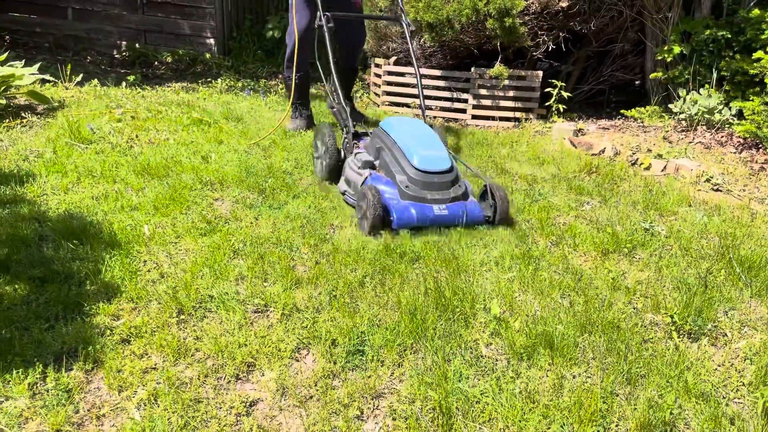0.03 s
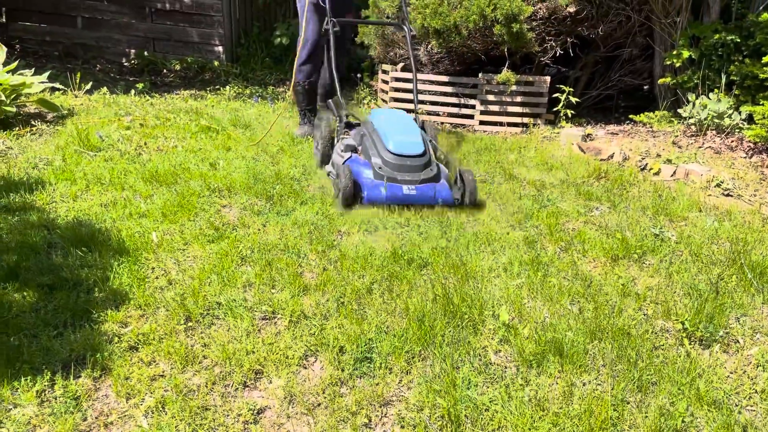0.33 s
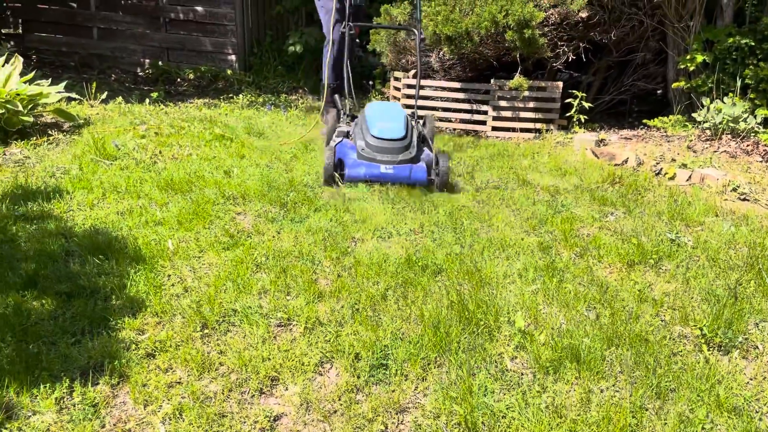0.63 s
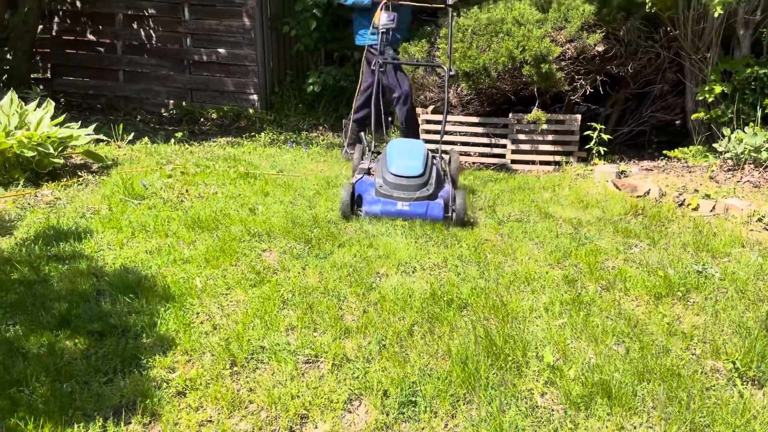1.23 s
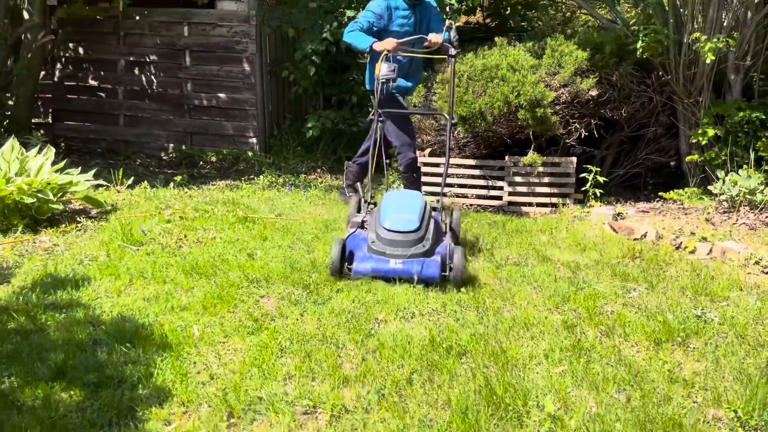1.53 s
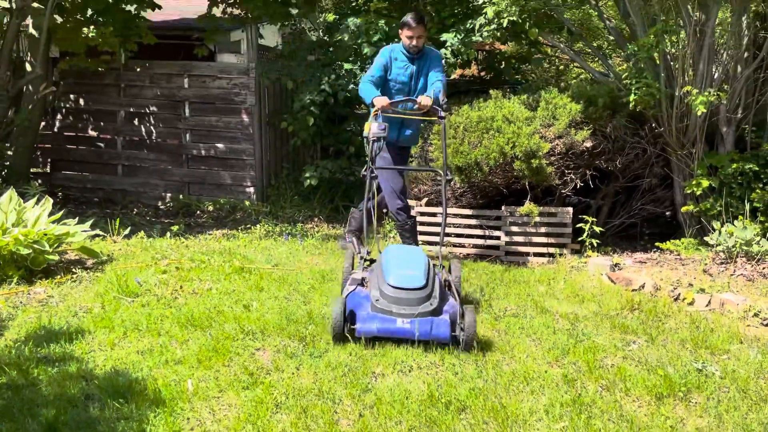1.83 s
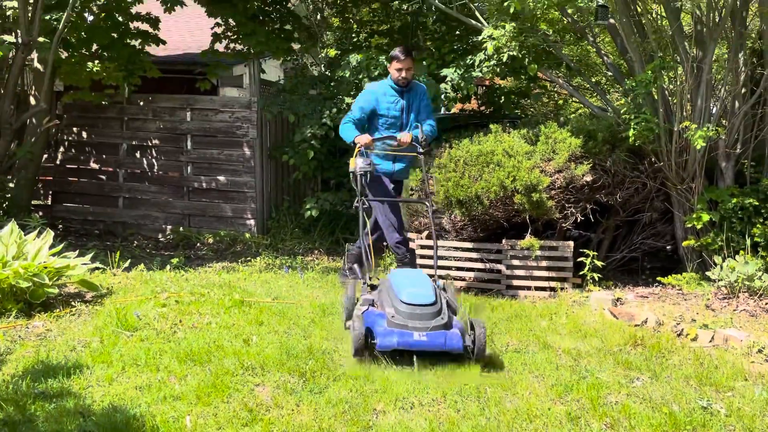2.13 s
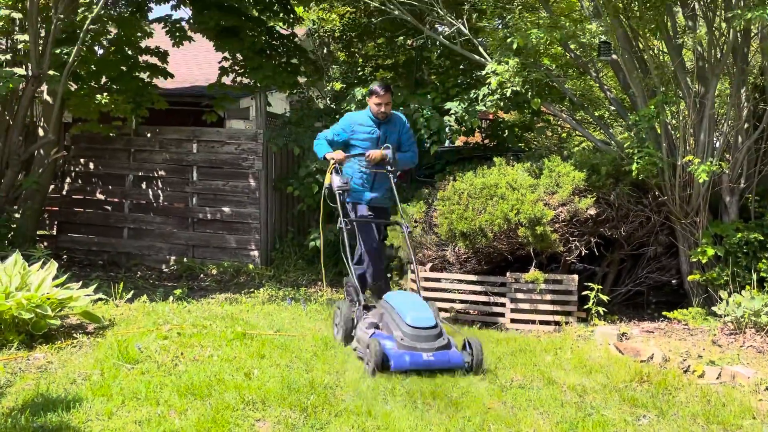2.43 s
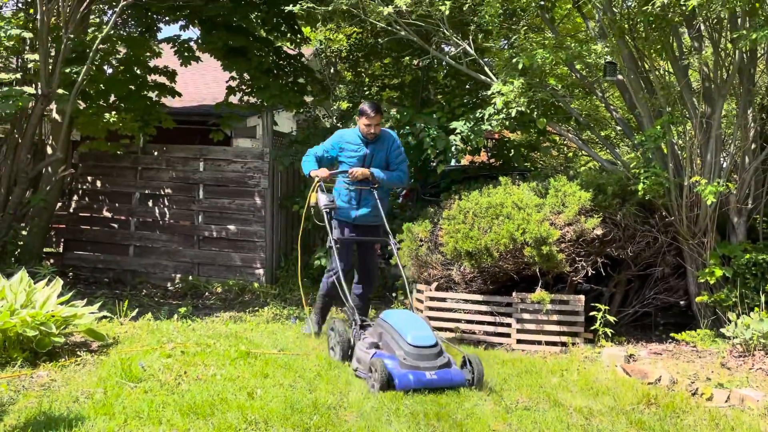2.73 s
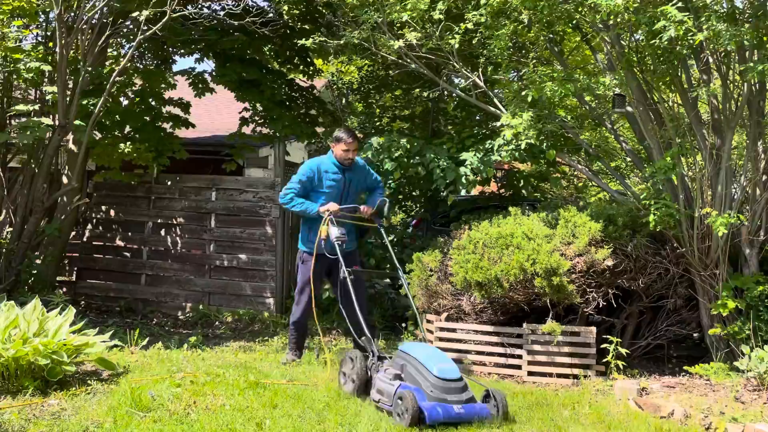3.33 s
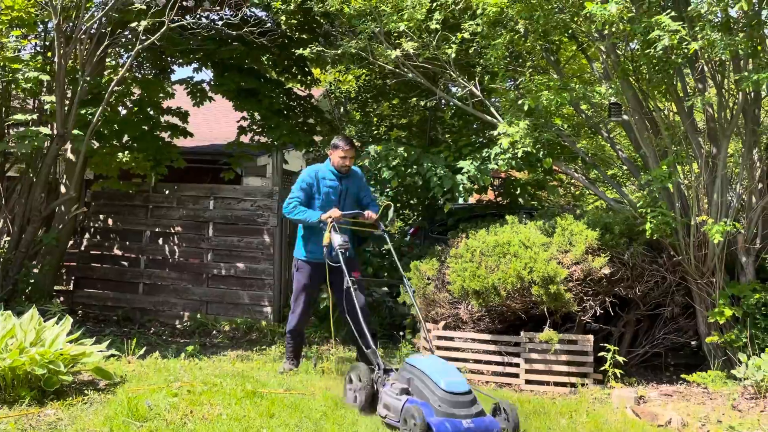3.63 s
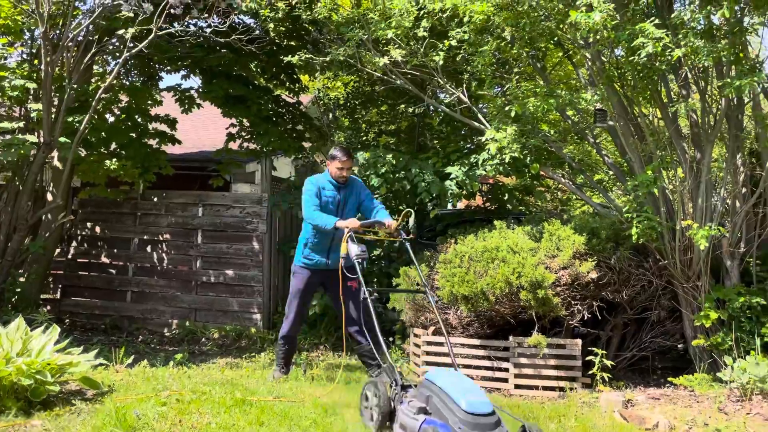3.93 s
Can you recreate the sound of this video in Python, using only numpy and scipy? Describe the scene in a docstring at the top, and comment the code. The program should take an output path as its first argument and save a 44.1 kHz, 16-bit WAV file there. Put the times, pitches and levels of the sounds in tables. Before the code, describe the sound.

An electric mower hums and whirs steadily as it moves over a lawn close to the microphone. Cut grass hisses, with small snaps and ticks early on, a single knock midway and a faint motor whine near the end.

```python
"""A pulsing drone and a rush of air: an electric mower is pulled back and pushed on over a nearby lawn.
Its two-armed blade sounds at twice the shaft speed and churns the air under the deck in puffs.
Grass hisses and crackles as it is cut, twigs knock on the deck and stalks snap against it.
There is one tiny squeak, and the thin whine of the motor rises near the end."""
import sys
import numpy as np
from scipy import signal
from scipy.fft import rfft, irfft
from scipy.io import wavfile
from scipy.ndimage import map_coordinates

SR = 44100
rng = np.random.default_rng(int(sys.argv[2]) if len(sys.argv) > 2 else 0)


def digitize_waveform(pressure):
    """Quantize a signal to 16-bit integers and store it at the path in sys.argv[1].

    Rows of a 2-D input are taken as channels; values are limited to [-1, 1].
    """
    field = np.atleast_2d(pressure).T
    bounded = np.clip(field, -1, 1)
    quanta = np.round(bounded * 32767).astype(np.int16)
    wavfile.write(sys.argv[1], SR, quanta)


N = 176400
T = np.arange(N) / SR
HZ = np.fft.rfftfreq(N, 1 / SR)

# Shaft speed, sagging a little under load (time [s], speed [turns/s])
SHAFT_SPEED = [(0, 60.7), (.3, 59.5), (.8, 58.8), (1.9, 59), (2.3, 59.55), (3, 59.6), (4, 60.3)]
# First four blade harmonics, swelling and fading as the mower moves (time [s], level [dB])
HARMONIC_1 = [(0, -16.5), (.1, -16), (.4, -17), (.68, -21.5), (1.1, -20), (1.4, -25.5), (1.55, -21.5),
              (2.1, -15.5), (2.28, -21), (2.42, -18.5), (3.3, -21.5), (3.45, -19), (4, -21)]
HARMONIC_2 = [(0, -19), (.17, -24), (.45, -29), (.56, -23), (.74, -29), (1.02, -21.5), (1.25, -35),
              (1.39, -21), (1.62, -30), (1.82, -25), (2.13, -28.5), (2.4, -24), (3.1, -21.5), (3.42, -28),
              (3.65, -21.5), (4, -27)]
HARMONIC_3 = [(0, -28), (.12, -17.5), (.24, -27.5), (.43, -21), (.53, -43), (1.22, -45), (1.32, -24.5),
              (1.56, -34.5), (1.67, -26.5), (2.2, -31.5), (2.36, -27), (3, -29), (3.5, -31), (4, -24)]
HARMONIC_4 = [(0, -31.5), (.26, -28), (.62, -36), (1.1, -29.5), (1.56, -33.5), (1.7, -25), (2, -35),
              (2.25, -37), (2.6, -33), (3.05, -26), (3.6, -42.5), (4, -28.5)]
# Once-per-turn throb of the unbalanced blade (time [s], level [dB])
THROB_LEVEL = [(0, -41), (2, -39.5), (2.5, -37), (4, -37)]
# Weaker tones (order [multiple of shaft speed], level [dB])
WEAK_TONES = [(3, -41), (9, -45), (10, -41), (12, -40.5), (14, -44.5), (18, -45)]
# Slide in the colour of rasp and buzz as the ground reflection changes (time [s], frequency ratio [1])
COLOUR_SHIFT = [(0, 0.97), (.9, .86), (3, 1)]
# Chopping of the air by the blade (time [s], relative depth [1])
CHOP_DEPTH = [(0, 0.83), (1.3, 0.69), (3.2, 0.96)]
# Churned air, the blade's rasp, a bright two-peaked buzz (frequency [Hz], relative density [dB])
ROAR_SPECTRUM = [(25, -29), (45, -13), (90, -6.5), (150, -0.5), (560, 1), (850, -8), (1850, -16.5),
                 (3200, -20.5), (6000, -33), (15500, -51.5)]
RASP_SPECTRUM = [(500, -28), (800, -4.5), (1020, -2.5), (1250, -1), (1700, -8.5), (2000, -14),
                 (4000, -30.5)]
BUZZ_SPECTRUM = [(1950, -20.5), (2300, 4), (2550, -7.5), (2850, 2), (3300, -20.5)]
# Strength of the rasp and of the bright buzz (time [s], relative level [dB])
RASP_LEVEL = [(.3, -27.5), (.6, -30.5), (1.1, -33.5), (1.5, -30), (1.85, -27), (2.13, -24.5), (2.25, -29.5),
              (2.9, -32), (3.5, -29.5)]
BUZZ_LEVEL = [(.2, -36.5), (.7, -42), (1.5, -38), (2.3, -40.5), (2.9, -39), (4, -40.5)]
# Cutting hiss and flying clippings (frequency [Hz], relative density [dB])
HISS_SPECTRUM = [(1000, -4.5), (1660, 6), (1850, -0.5), (3200, -2), (3800, 3.5), (4500, 1), (6000, -0.5),
                 (7500, -2), (9000, -4.5), (15500, -49)]
CLIPPING_SPECTRUM = [(3800, -22), (7000, 1.5), (10000, -1), (15500, -14)]
# Strength of the hiss and of the clippings (time [s], relative level [dB])
HISS_LEVEL = [(0, -34.5), (.3, -32.5), (.42, -38), (.5, -40), (.77, -34.5), (.84, -45), (1.15, -43),
              (1.75, -35.5), (1.92, -30), (2.12, -30.5), (2.25, -38), (2.9, -39.5), (3.5, -35), (4, -36.5)]
CLIPPING_LEVEL = [(0, -39), (.55, -34.5), (.95, -42.5), (1.45, -39.5), (1.8, -45), (2.3, -44), (3.1, -48.5),
                  (3.55, -38), (4, -39)]
# Twigs striking the plastic deck (time [s], level [dB], resonance [Hz])
TWIG_KNOCKS = [(0.136, -29, 2500), (0.153, -27.5, 3800), (0.524, -25.5, 2400), (.692, -26, 2400),
               (.694, -29.5, 4900), (2.276, -15.5, 615)]
# Stalks breaking (time [s], level [dB])
STALK_SNAPS = [(.1363, -18.5), (.465, -22), (0.48, -21), (.489, -24), (0.506, -19.5), (.523, -21),
               (.772, -25), (.787, -22), (.981, -25), (1.644, -27), (2.093, -25), (2.681, -22.5),
               (3.566, -23), (3.575, -22), (3.593, -26), (3.88, -23.5)]
# Crack of a stalk (frequency [Hz], relative density [dB])
SNAP_SPECTRUM = [(2000, -3.5), (10000, -3.5), (15500, -8.5)]
# Course of the squeak (time [s], pitch [Hz], level [dB])
SQUEAK_PATH = [(1.305, 9750, -75), (1.325, 9800, -32.5), (1.35, 10000, -43), (1.39, 10100, -37),
               (1.41, 10300, -70)]
# Whine of the motor (time [s], level [dB])
WHINE_LEVEL = [(2.7, -60), (3, -50.5), (4, -53)]
# Likeness of left and right (frequency [Hz], coherence [0-1])
COHERENCE = [(300, 0.98), (700, 0.76), (2400, 0.95), (6100, 0.55), (7000, 1), (11000, 0.98)]
# Stereo balance (time [s], left minus right [dB])
BALANCE = [(1, .5), (4, -.7)]
# Phase difference at the microphone pair (frequency [Hz], lead of left [rad])
PHASE_LEAD = [(2200, .1), (3500, .8), (5000, .1), (6000, .5), (6700, 3.05), (7800, 3.1), (10300, .1),
              (11900, 0), (13600, -3.1)]


def amp(db):
    """Amplitude grows tenfold with every 20 dB."""
    return 10 ** (np.asarray(db) / 20)


def unit(x):
    """Normalisation to rms 1."""
    return x / np.sqrt(np.mean(x ** 2) + 1e-20)


def curve(rows, column=1):
    """Linear interpolation of a time table at every sample."""
    rows = np.array(rows)
    return np.interp(T, rows[:, 0], rows[:, column])


def across(rows):
    """Interpolation of a frequency table at every bin, on a logarithmic axis."""
    hz, value = np.transpose(rows)
    return np.interp(np.log(HZ + 1), np.log(hz + 1), value)


def noise():
    """White Gaussian noise in two independent channels."""
    return rng.standard_normal((2, N))


def colour(x, spectrum):
    """Spectral shaping that conserves the power of white noise."""
    return irfft(rfft(x) * unit(amp(across(spectrum))), N)


def drift(rate_hz):
    """Low-pass filtered noise gives a smooth random fluctuation of rms 1."""
    return unit(irfft(rfft(rng.standard_normal(N)) * np.exp(-(HZ / rate_hz) ** 2), N))


def decay(start, decay_s):
    """Exponential damping after a sudden onset."""
    return (T >= start) * np.exp(-abs(T - start) / decay_s)


def spread(pair):
    """The sum and difference of independent signals form a partly coherent left and right."""
    coherence = np.clip(across(COHERENCE), 0, 1)
    mid, side = irfft(rfft(pair) * np.sqrt([(1 + coherence) / 2, (1 - coherence) / 2]), N)
    return np.array([mid + side, mid - side])


def blade(angle):
    """Periodic forcing: two arms radiate even shaft orders, imbalance the first; weaker orders join in."""
    harmonics = [HARMONIC_1, HARMONIC_2, HARMONIC_3, HARMONIC_4]
    tones = [(2 * k, curve(level)) for k, level in enumerate(harmonics, 1)]
    tones += [(1, curve(THROB_LEVEL))]
    tones += [(round(order), db + 3 * drift(rate_hz=8)) for order, db in WEAK_TONES]
    wander_rad, channel_wander_rad, flutter_db = .03, .032, .5
    out = np.zeros((2, N))
    for order, db in tones:
        lag = .1 * (order / 2) ** 2  # the deck delays the higher tones a little
        phase = order * (angle + wander_rad * drift(rate_hz=7.7)) - lag
        level = amp(db + flutter_db * drift(rate_hz=26))
        for channel in out:
            channel += level * np.cos(phase + order * channel_wander_rad * drift(rate_hz=2.1))
    return np.sqrt(2) * out


def sliding_turbulence(spectrum):
    """Interference: the noise's colour slides as the ground reflection changes with the mower's movement."""
    position = np.cumsum(curve(COLOUR_SHIFT))  # resampling scales every frequency
    turbulence = colour(noise(), spectrum)
    return np.array([map_coordinates(channel, [position], mode="wrap") for channel in turbulence])


def air(angle):
    """Amplitude modulation: each blade arm puffs the turbulence, strongly in the rasp, weakly in the roar."""
    puffs = curve(CHOP_DEPTH) * abs(np.cos(angle)) ** 6
    chop = puffs + .095 * np.cos(angle)  # one arm's puff is the stronger
    roar = colour(noise() * unit(1 + .083 * chop), ROAR_SPECTRUM)
    rasp = sliding_turbulence(RASP_SPECTRUM) * unit(1 + .77 * chop)
    buzz = sliding_turbulence(BUZZ_SPECTRUM) * unit(1 + .5 * chop)
    swell_db = curve(RASP_LEVEL)
    roar_db = -25 + .39 * (swell_db - swell_db.mean())  # follows the rasp in part
    rasp_db = swell_db - 2 + .9 * drift(rate_hz=32)
    return spread(roar * amp(roar_db) + rasp * amp(rasp_db) + buzz * amp(curve(BUZZ_LEVEL)))


def grass(clicks_per_s=240, click_decay_s=.0012):
    """Shot noise: countless cuts merge into a hiss, while sparser flying clippings crackle."""
    hiss_db = curve(HISS_LEVEL) - 4 + 2.25 * drift(rate_hz=19)
    hiss = colour(noise() * amp(hiss_db), HISS_SPECTRUM)
    click_db = 4.5 * np.minimum(rng.exponential(1, N), 3)
    clicks = amp(click_db) * (rng.random(N) < clicks_per_s / SR)
    bursts = unit(signal.lfilter([1], [1, -np.exp(-1 / (click_decay_s * SR))], clicks))
    envelope = np.hypot(1, amp(-1) * bursts)  # bursts add in power to a steady floor
    crackle = colour(noise() * envelope * amp(curve(CLIPPING_LEVEL) - 6), CLIPPING_SPECTRUM)
    return spread(hiss + crackle)


def twigs(decay_s=.0087, half_width_hz=490):
    """Impact excitation: each twig briefly rings a resonance of the part of the deck that it hits."""
    spectrum = 0
    for start, db, hz in TWIG_KNOCKS:
        blow = noise() * amp(db) * decay(start, decay_s)
        resonance = unit(1 / (1 + ((HZ - hz) / half_width_hz) ** 2))
        spectrum += rfft(blow) * resonance
    return spread(irfft(spectrum, N))


def stalks(crack_s=.0012, tail_s=.018, tail_db=-18):
    """Fracture gives a sharp broadband crack; scattering inside the deck adds a short tail."""
    envelope = sum(amp(db) * (decay(start, crack_s) + amp(tail_db) * decay(start, tail_s))
                   for start, db in STALK_SNAPS)
    return spread(colour(noise() * envelope, SNAP_SPECTRUM))


def squeak():
    """Random frequency modulation roughens a tiny rising tone, perhaps from a wheel."""
    hz = curve(SQUEAK_PATH) + 60 * drift(rate_hz=330)
    sounding = (T > SQUEAK_PATH[0][0]) & (T < SQUEAK_PATH[-1][0])
    return sounding * amp(curve(SQUEAK_PATH, column=2)) * np.sin(2 * np.pi * np.cumsum(hz) / SR)


def whine(angle, order=80):
    """A rotational harmonic: the motor's faint tone is locked to a high multiple of the shaft speed."""
    return amp(curve(WHINE_LEVEL)) * np.sin(order * angle)


def scene(speed_jitter=.001, fade_s=.004):
    """Superposition: one shaft drives blade, air and whine; the whole mower drifts slightly right."""
    turns_per_s = curve(SHAFT_SPEED) * (1 + speed_jitter * drift(rate_hz=7.4))
    angle = 2 * np.pi * np.cumsum(turns_per_s) / SR
    mower = blade(angle) + air(angle) + grass() + twigs() + stalks() + squeak() + whine(angle)
    fade = np.minimum(np.minimum(T, T[::-1]) / fade_s, 1)
    pan_db = curve(BALANCE) / 2
    return fade * mower * amp([pan_db, -pan_db])


def record(dry, cutoff_hz=15800):
    """Phase difference: the microphone pair offsets the treble between the sides, then limits the band."""
    lead = across(PHASE_LEAD)
    shifted = irfft(rfft(dry) * np.exp(.5j * np.array([lead, -lead])), N)
    lowpass = signal.firwin(511, cutoff_hz, window=("kaiser", 9), fs=SR)
    return signal.oaconvolve(shifted, lowpass[None], "same")


dry = scene()
out = record(dry)
digitize_waveform(out)
```